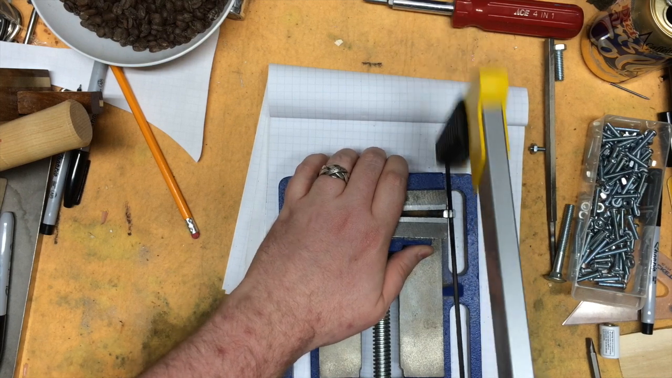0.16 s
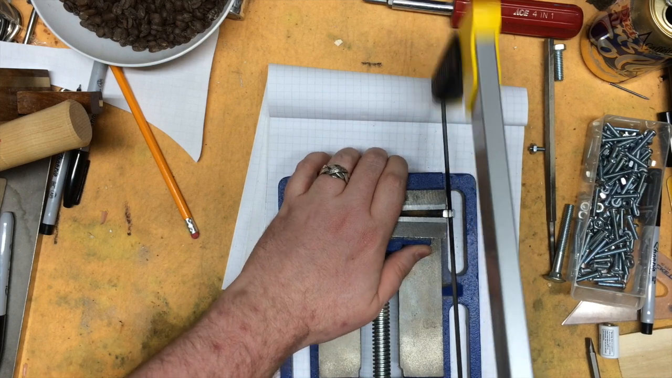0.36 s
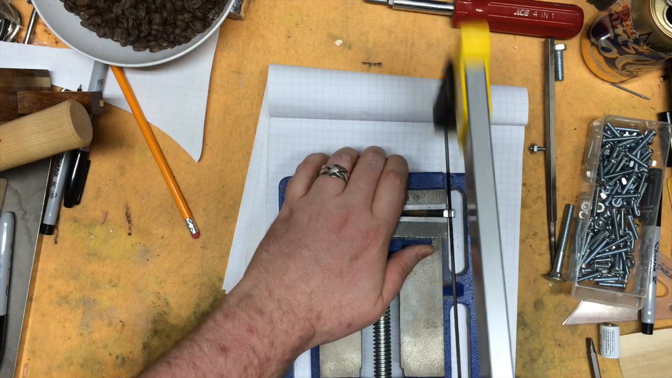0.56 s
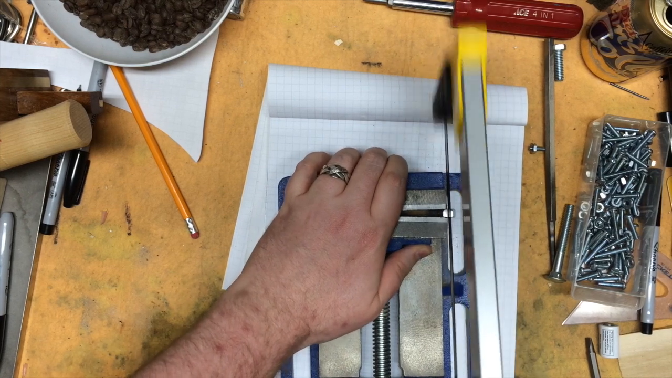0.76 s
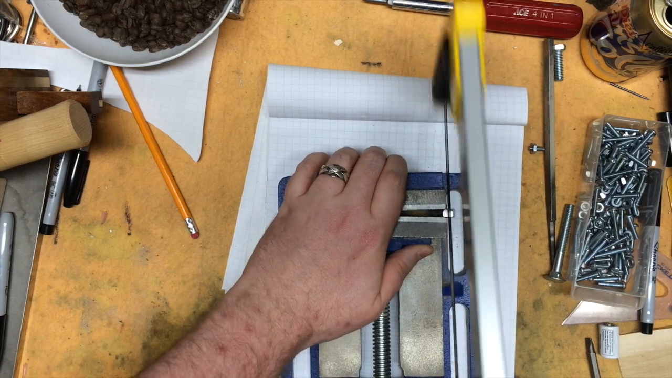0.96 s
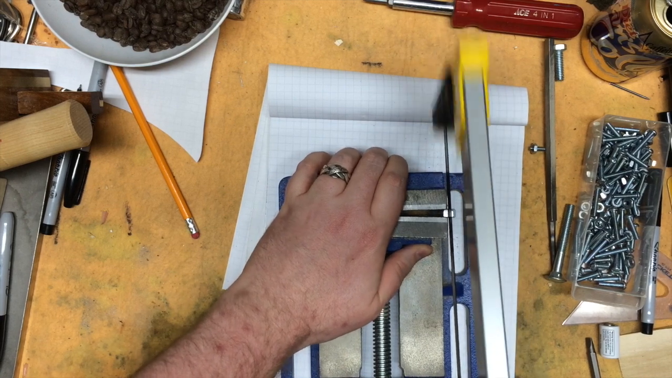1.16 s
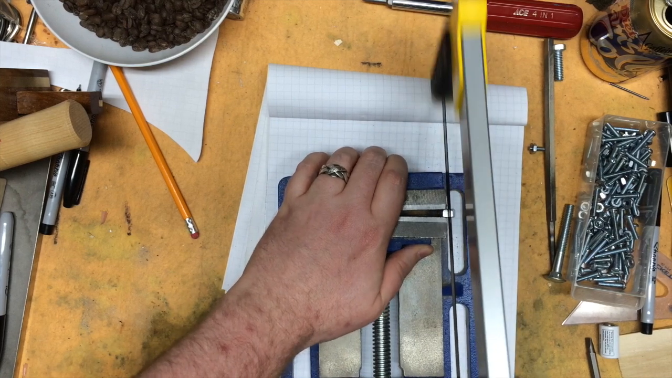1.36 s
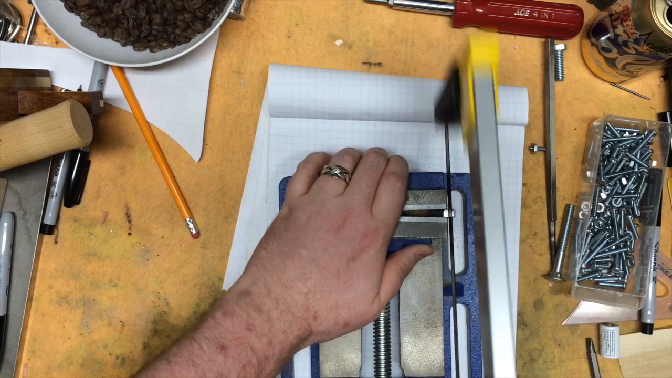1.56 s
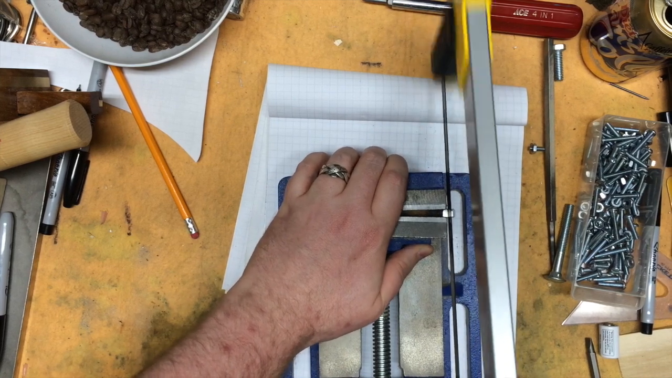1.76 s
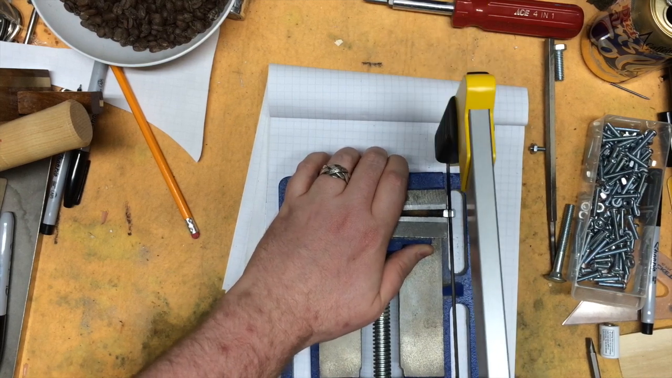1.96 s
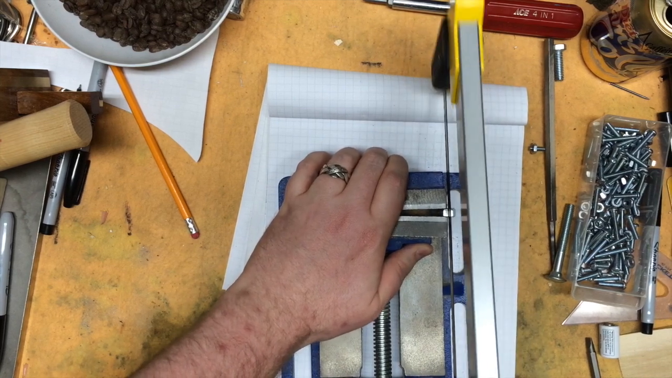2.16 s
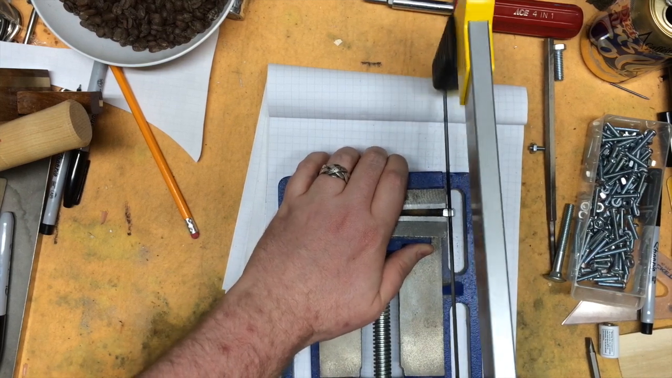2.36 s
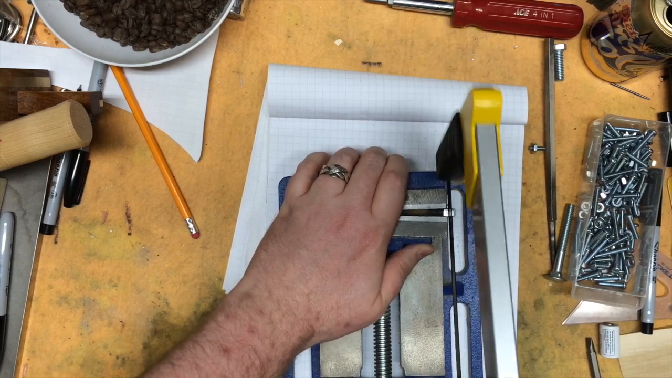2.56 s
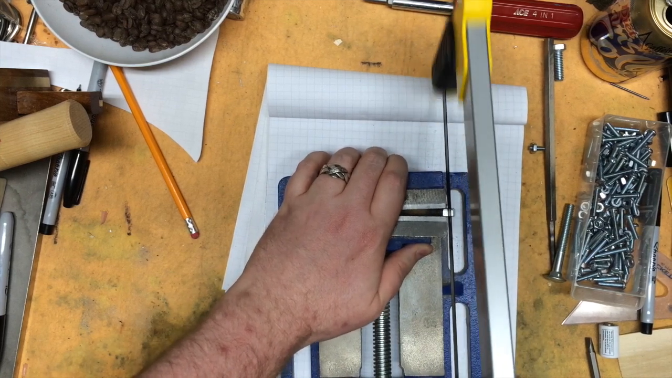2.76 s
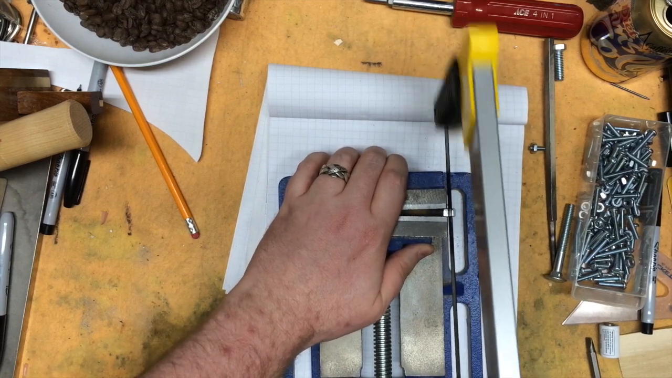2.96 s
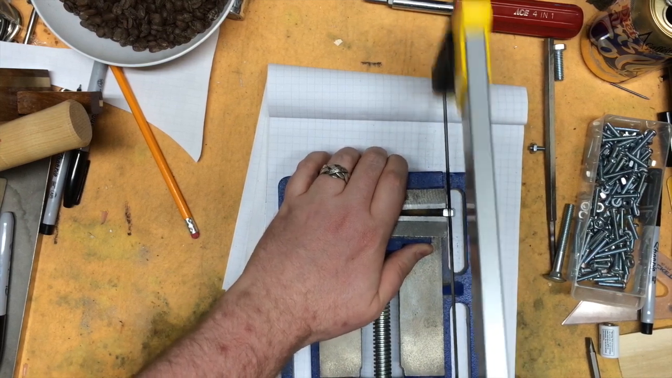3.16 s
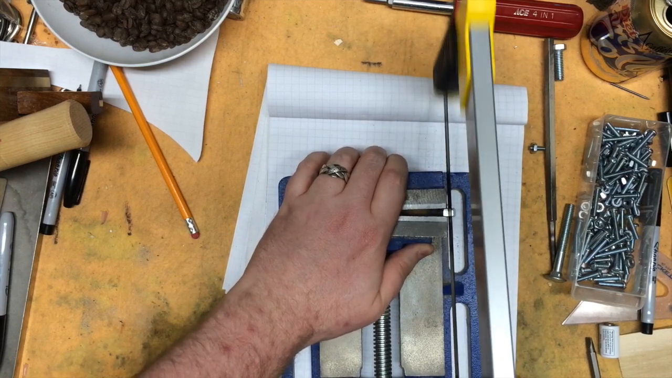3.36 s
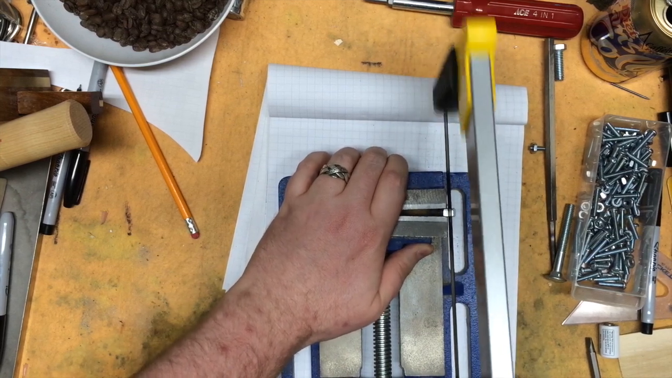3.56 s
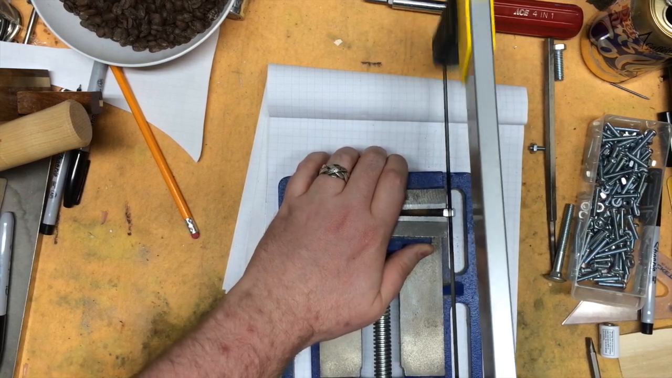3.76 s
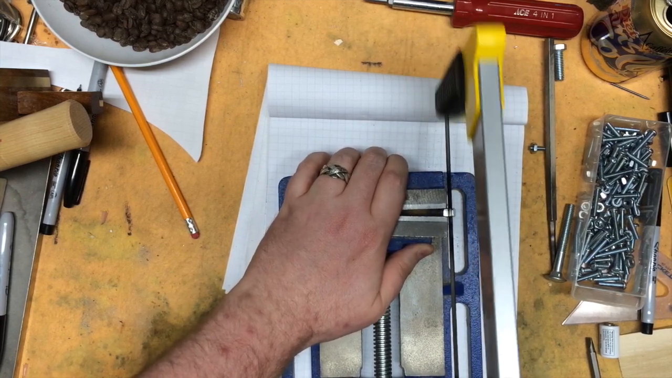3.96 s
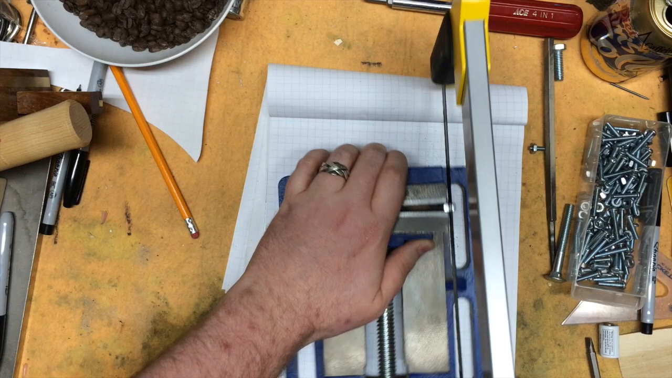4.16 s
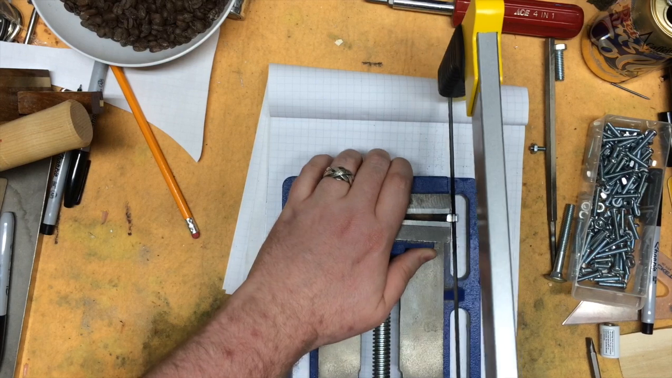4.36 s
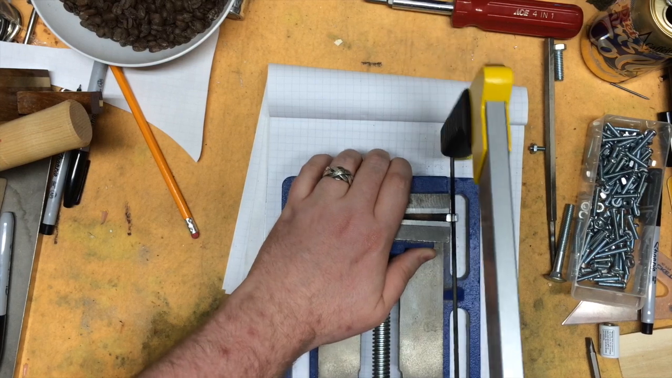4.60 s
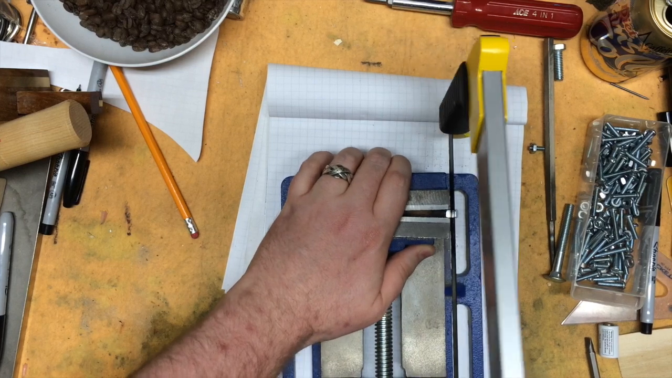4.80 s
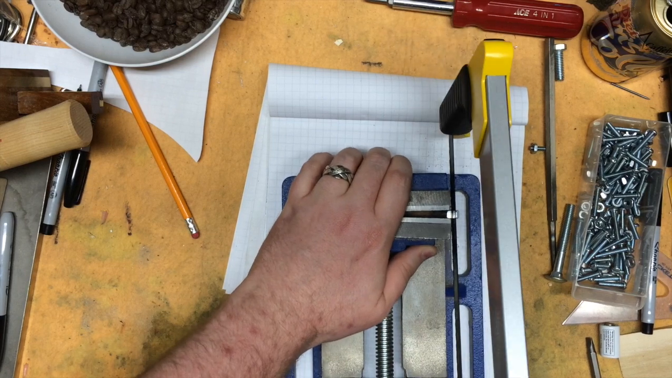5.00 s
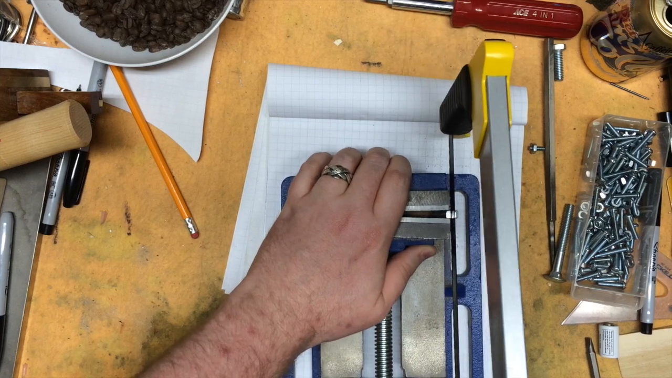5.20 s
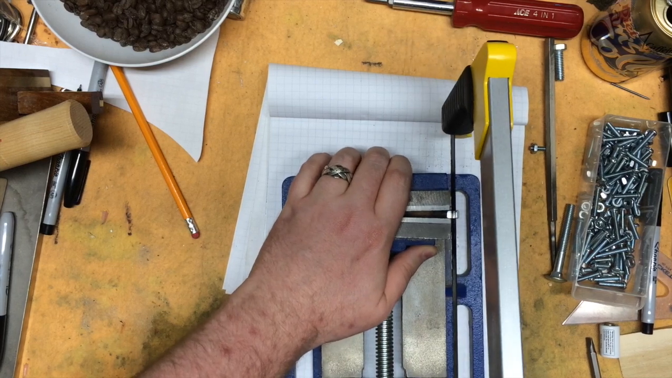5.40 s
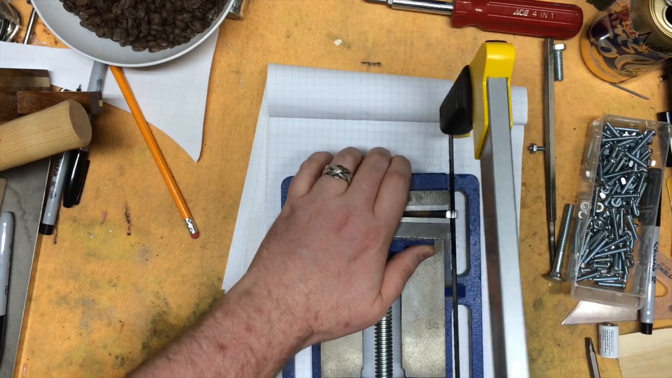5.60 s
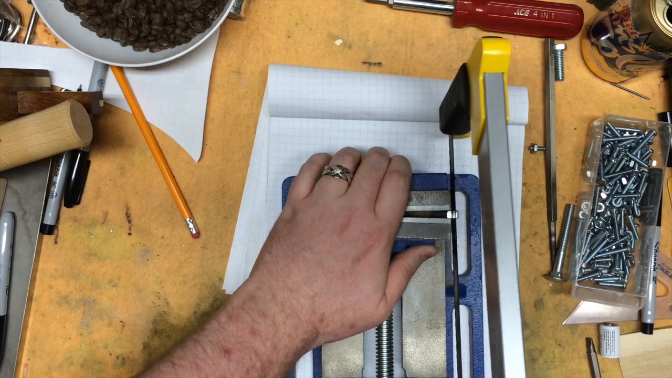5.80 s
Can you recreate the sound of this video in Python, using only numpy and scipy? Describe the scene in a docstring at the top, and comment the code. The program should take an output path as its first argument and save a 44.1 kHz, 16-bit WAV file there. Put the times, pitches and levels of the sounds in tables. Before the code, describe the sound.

A hacksaw cuts a steel nut clamped in a vise, close up in a small, quiet workshop. Quick, even strokes rasp back and forth, the blade ringing higher and lower as it changes direction. The teeth catch with sharp clicks and the wooden bench thumps underneath. After about four seconds the sawing slows, knocks to a stop and rattles briefly, leaving faint room noise.

```python
"""A hacksaw cuts a steel nut held in a small vise on a wooden bench, in quick, even strokes.
Its teeth tear off chips and shake the blade, frame and vise. The free part of the blade sings
higher as the saw goes out and lower as it comes back. The bench thumps where a push bites and
groans as the blade slows. At the end the saw slows, knocks to a stop and rattles out,
leaving the quiet air of a small workshop."""
import sys
import numpy as np
from scipy import signal
from scipy.io import wavfile
from scipy.ndimage import uniform_filter1d

SR = 44100
rng = np.random.default_rng(int(sys.argv[2]) if len(sys.argv) > 2 else 0)


def dump(signal):
    """Clip the signal to [-1, 1] and save it as 16-bit WAV at the path in sys.argv[1]."""
    limited = np.clip(np.atleast_2d(signal).T, -1, 1)
    pcm = np.round(limited * 32767).astype(np.int16)
    wavfile.write(sys.argv[1], SR, pcm)


N = 257499
TIME = np.arange(N) / SR


def amp(db):
    """Turns decibels into a number to multiply by."""
    return 10 ** (np.asarray(db) / 20)


def unit(x):
    """Scales a signal to an average strength (rms) of 1."""
    return x / np.sqrt(np.mean(x ** 2) + 1e-20)


def look_up(points, hz):
    """Reads between the rows of a table, on a log scale of pitch."""
    pitches, values = np.transpose(points)
    return np.interp(np.log(hz + 1), np.log(pitches + 1), values)


def add(mix, start_s, sound):
    """Mixes a sound in at the given time."""
    part = mix[max(round(start_s * SR), 0):][:len(sound)]
    part += sound[:len(part)]


def band(x, low_hz, high_hz):
    """Keeps the part of a sound between two pitches."""
    return signal.sosfilt(signal.butter(3, [low_hz, high_hz], "band", fs=SR, output="sos"), x)


def colour(x, points, size=8192):
    """Makes each pitch louder or softer, following a table of pitch_hz, level_db."""
    log_gain = np.log(amp(look_up(points, abs(np.fft.fftfreq(size, 1 / SR)))))
    response = np.exp(np.conj(signal.hilbert(log_gain)))  # nothing rings before its cause
    taps = np.fft.ifft(response).real[:size // 2]
    return signal.oaconvolve(x, taps)[:len(x)]


def resonate(x, hz, width_hz):
    """Makes a sound ring at one sliding pitch; a smaller width rings longer."""
    turn = np.exp(2j * np.pi * np.cumsum(hz) / SR)
    keep = np.exp(-np.pi * width_hz / SR)
    return 2 * (turn * signal.lfilter([1 - keep], [1, -keep], x / turn)).real


def body(x, tones):
    """Makes a sound ring at an object's own tones: rows of pitch_hz, width_hz, level_db."""
    t = np.arange(SR // 5) / SR
    ring = sum(amp(db) * 2 * np.pi * width / SR * np.exp(-np.pi * width * t) * np.cos(2 * np.pi * hz * t)
               for hz, width, db in tones)
    return signal.oaconvolve(x, ring)[:len(x)]


def wander(per_s):
    """A smooth random wobble that changes about per_s times a second."""
    size = int(SR / per_s)
    return unit(uniform_filter1d(uniform_filter1d(rng.standard_normal(N), size), size))


# The saw's strokes. A rise is the lean in level from start to end; fizz counts from the rasp's level.
# start_s, end_s, rasp_db, rasp_rise_db, fizz_db, bite_db, bite_rise_db, shake_db, from_hz, to_hz
STROKES = [ (-0.102, 0.063, -46.5, 6, -8.5, -47.5, -3, -44, 750, 1150),
           (0.087, 0.308, -34.5, -5, -9, -45.5, -5, -43.5, 1206, 686),
           (0.325, 0.511, -38, 5.5, -6, -41.5, 6, -40, 967, 1130),
           (0.572, 0.786, -38.5, -26, -7.5, -45, -9.5, -44.5, 1040, 650),
           (0.771, 0.952, -36, 8.5, -6.5, -41.5, 7.5, -40.5, 756, 1180),
           (0.986, 1.176, -33, -6, -9, -43.5, 1.5, -41, 1090, 680),
           (1.192, 1.357, -34.5, 3.5, -7.5, -36, -7, -40.5, 675, 924),
           (1.393, 1.592, -36, -17, -8.5, -44.5, 16.5, -46, 1090, 740),
           (1.585, 1.78, -35.5, 5.5, -7, -38, 20.5, -40.5, 745, 1140),
           (1.809, 2.055, -36.5, -21, -10, -43, -9, -43.5, 1104, 660),
           (2.056, 2.284, -42, 7.5, -7, -41, -5, -42.5, 700, 1116),
           (2.434, 2.719, -39, -5, -9.5, -40, 7, -47, 820, 685),
           (2.68, 2.907, -37.5, 7.5, -8.5, -35.5, 6, -41.5, 744, 1137),
           (2.949, 3.14, -38, -10.5, -10.5, -45, 3.5, -49.5, 1064, 720),
           (3.154, 3.36, -36.5, 1.5, -8, -39, -9.5, -46, 883, 1160),
           (3.373, 3.569, -40, -8, -11, -49, -24.5, -48.5, 1146, 1040),
           (3.596, 3.791, -39, 6, -8, -36.5, 9.5, -45.5, 990, 1130),
           (3.833, 4.018, -40, -21.5, -12, -46.5, -19, -48.5, 1123, 820),
           (4.033, 4.178, -35.5, 9, -9, -40, -14, -41.5, 1025, 1160),
           (4.235, 4.344, -43, 1, -3, -47, 0, -48.5, 803, 724),
           (4.493, 4.835, -50, -47, -10, -53.5, -36, -44.5, 900, 1140),
           (4.797, 4.84, -32.5, 1, -10.5, -37, -16.5, -34.5, 1100, 1110)]


def hand_motion(dwell=1.3):
    """The hand speeds up and slows in each stroke: gives its speed (0-1) and the blade's pitch."""
    speed, blade_hz = np.zeros(N), np.full(N, float(STROKES[0][-2]))
    for start, end, *_, from_hz, to_hz in STROKES:
        angle = np.pi * np.clip((TIME - start) / (end - start), 0, 1)
        travel = (1 - np.tanh(dwell * np.cos(angle)) / np.tanh(dwell)) / 2  # clings to both ends
        speed = np.maximum(speed, np.sin(angle))
        blade_hz = np.where(TIME >= start, from_hz + (to_hz - from_hz) * travel, blade_hz)
    return speed, blade_hz


def stroke_level(levels_db, rises_db, speed_power, linger_db, linger_s):
    """Level in dB: a stroke swells with speed, leans early or late with pressure, then lingers."""
    power = np.zeros(N)
    for (start, end, *_), db, rise_db in zip(STROKES, levels_db, rises_db):
        during = (TIME > start) & (TIME < end)
        progress = (TIME[during] - start) / (end - start)
        pressure = amp(db + rise_db * (progress - .5))
        power[during] += (pressure * np.sin(np.pi * progress) ** speed_power) ** 2
    power = abs(uniform_filter1d(power, size=400))  # the hand never turns in an instant
    keep = np.exp(-np.log(1e6) / (linger_s * SR))  # falls 60 dB in linger_s
    lingering = amp(linger_db) ** 2 * signal.lfilter([1 - keep], [1, -keep], power)
    return 10 * np.log10(power + lingering + 1e-14)


def teeth(speed, jitter=.06, grip=0.99, slide=0.38, chips_per_s=3500, chip_db=2.5, uneven_db=0.9):
    """The cutting force: each passing tooth gives a burst of rubbing, and chips snap off at random."""
    teeth_per_s = (165.6 + 540 * speed) * (1 + jitter * wander(90))
    passed = np.cumsum(teeth_per_s) / SR
    contact = slide + np.exp(-(passed % 1) / grip)
    snaps = (rng.random(N) < chips_per_s / SR) * rng.choice([-1, 1], N)
    chips = snaps * amp(chip_db * np.minimum(rng.exponential(1, N), 2.5))
    rubbing = rng.standard_normal(N)
    return unit(contact * (rubbing + 0.5 * unit(chips))) * amp(uneven_db * wander(140))


def moving_contact(x, patchy_db=3.5):
    """The cut moves along the blade, so the blade's many close tones take turns to ring."""
    spectrum = signal.stft(x, nperseg=512, noverlap=384)[2]
    patches = uniform_filter1d(rng.standard_normal(spectrum.shape), size=14, axis=1)  # smooth in time
    patches = unit(uniform_filter1d(patches, size=2, axis=0))  # and in pitch
    spectrum = spectrum * amp(patchy_db * np.clip(patches, -2, 2))
    return unit(signal.istft(spectrum, nperseg=512, noverlap=384)[1][:N])


# The overall colour of scraping steel: pitch_hz, level_db
SCRAPE_COLOUR = [(150, -19), (300, -14.5), (550, -26.5), (1000, -9.5), (1500, -15), (1900, -9.5),
                 (2600, -3.5), (4000, -6), (5600, -13), (7800, -14), (9000, -23), (10500, -30.5),
                 (12000, -40), (13300, -29), (15300, -31)]
# Tones of the blade, frame and vise under the teeth: pitch_hz, width_hz, level_db
STEEL_TONES = [(1460, 90, -13.5), (1773, 170, -10.5), (2186, 60, -3.5), (2459, 75, -1), (2590, 25, -2),
               (2683, 47, 7), (2910, 37, -4), (3100, 40, -15), (3174, 26, -2.5), (3510, 100, -12.5),
               (4020, 36, -8), (4087, 88, -9.5), (4140, 76, -15.5), (4830, 230, -13.5), (5630, 75, -17),
               (6830, 43, -12), (7210, 55, -8), (7480, 24, -3), (8300, 39, -29), (12200, 100, -15.5),
               (14700, 230, -31.5)]


def rasp(force, level_db, fizz_db, blade_hz, end_echo=0.61, steel_db=3, split_hz=6300):
    """The teeth scrape steel: a broad hiss and ringing metal, with a fizz of fine chips on top."""
    returning = np.interp(TIME - 1 / blade_hz, TIME, force)  # waves come back from the blade's end
    along = moving_contact(force + end_echo * returning)
    sideways = moving_contact(force * rng.choice([-1, 1], N))  # angled teeth kick left and right
    sound = colour(along, SCRAPE_COLOUR) + amp(steel_db) * body(sideways, STEEL_TONES)
    scrape = signal.sosfiltfilt(signal.butter(4, split_hz, fs=SR, output="sos"), sound)
    fizz = sound - scrape
    return amp(level_db) * (amp(0.4) * unit(scrape) + amp(fizz_db - 0.06) * unit(fizz))


# Tones of the vise and the nut: pitch_hz, width_hz, level_db
VISE_TONES = [(737, 16, -13), (760.5, 17, -5), (926, 17, -4.5), (1090, 50, -19.5), (1113, 16, 10),
              (1100, 19, -16.5)]


def bite(force, level_db, blade_hz, waver=0.06, flicker_db=2, blade_db=-8, shared_db=-4, vise_db=-6):
    """The free part of the blade sings in fits, and swells where its pitch meets a tone of the vise."""
    hz = blade_hz * (1 + waver * wander(50))
    blade = resonate(resonate(force, hz, width_hz=80), hz, width_hz=450)
    blade = unit(blade * amp(flicker_db * wander(35)))
    shared = body(blade, VISE_TONES)
    power = uniform_filter1d(shared ** 2, size=1600) + 0.042 * np.mean(shared ** 2)
    shared = shared / np.sqrt(power)  # rubbing limits the swing
    vise = unit(body(force, VISE_TONES))
    swell = uniform_filter1d(amp(level_db), size=1200)  # the swing takes time to build and to fade
    return swell * (amp(blade_db) * blade + amp(shared_db) * shared + amp(vise_db) * vise)


# The hand eases off and the blade goes loose: time_s, looseness (0 tight, 1 loose)
LOOSENESS = [(4.1, 0.02), (4.125, 1), (4.5, 0.18), (4.8, 0.99)]


def blade_in_slot(force, level_db, blade_hz):
    """A tight blade bites and sings; a loose one only scuffs the slot, dull and broad."""
    loose = np.interp(TIME, *np.transpose(LOOSENESS))
    singing = bite(force, level_db, blade_hz)
    scuff = amp(level_db) * unit(band(force, low_hz=450, high_hz=1100))
    return np.sqrt(1 - loose) * singing + np.sqrt(loose) * scuff


# The colour of the shaking bench: pitch_hz, level_db
BENCH_COLOUR = [(20, -23.5), (45, -12), (65, -5), (80, -6), (105, -5), (124, 5), (145, -7.5), (180, -4),
                (220, -8.5), (255, -21.5), (330, -23), (500, -34), (1000, -55)]


def bench_rumble(level_db, trim_db=-1):
    """The bench rumbles under the strokes, and the hand's weight evens it out."""
    rumble = colour(rng.standard_normal(N), BENCH_COLOUR)
    power = uniform_filter1d(rumble ** 2, size=2200) + 0.13 * np.mean(rumble ** 2)
    return amp(level_db + trim_db) * rumble / np.sqrt(power)


# The colour of the workshop's still air: pitch_hz, level_db
AIR_COLOUR = [(15, -46), (25, -19.5), (59, 1), (96, -8.5), (129, 7), (156, -12), (349, -13.5), (582, -22.5),
              (722, -23), (1170, -29), (1620, -29.5), (3340, -33), (8130, -38.5), (10900, -38),
              (15500, -43)]


def air(air_db=-63.5, hiss_hz=11000, hiss_width_hz=300, hiss_db=-86):
    """Low, steady room noise with a faint high hiss."""
    still = unit(colour(rng.standard_normal(N), AIR_COLOUR))
    hiss = unit(body(rng.standard_normal(N), [(hiss_hz, hiss_width_hz, 0)]))
    return amp(air_db) * still + amp(hiss_db) * hiss


# Tones of the saw's frame: pitch_hz, level_db, ring_s (time to fall 60 dB)
FRAME_TONES = [(1447, -8, 0.18), (1716, -6, 0.23), (2400, -8.5, 0.11), (2620, 3, 0.16), (2640, 6, 0.073),
               (2830, -14.5, .2), (2866, -5.5, .1), (3200, -2, 0.15), (3500, -6, 0.14), (3320, -4.5, 0.16),
               (3950, 1.5, .14), (4190, -24.5, .15), (4530, -14, .11), (4904, -11.5, 0.073),
               (6368, -20, .15), (7270, -20.5, .12)]


def frame_ring(t):
    """The frame rings freely after a knock, starting at a strength of 1."""
    ring = sum(amp(db - 60 * t / ring_s) * np.sin(2 * np.pi * (hz * t + rng.random()))
               for hz, db, ring_s in FRAME_TONES)
    return ring / ring[:SR // 250].std()


# Teeth catch and the saw knocks in the slot: time_s, snap_db (crack and ring), thud_db
CATCHES = [(0.1065, -40, -40), (0.125, -30, -31), (0.191, -23, -52), (0.5832, -19.5, -32.5),
           (0.876, -17.5, -30), (1.027, -17, -36), (1.4058, -37, -37.5), (1.686, -20, -27.5),
           (1.8404, -24.5, -28), (1.893, -17.5, -41), (2.9634, -50, -53), (3.218, -26, -28),
           (3.42, -44, -41), (3.4731, -24, -33), (3.703, -45, -31), (3.865, -32, -29.5),
           (4.073, -40.5, -20), (4.098, -27, -18.5), (4.132, -25, -47.5), (4.1733, -25.5, -62),
           (4.5107, -35, -40.5), (4.8056, -24, -24.5), (4.8222, -19.5, -48.5), (4.839, -21.5, -43)]


def tooth_catches(crack_db=-13, ring_db=-18, vise_db=-4, rise_s=.002, crack_s=0.0035, drag_s=0.00397):
    """A tooth snags and lets go: its drag swings the vise, then comes a crack and the frame rings."""
    out, t = np.zeros(N), np.arange(SR // 2) / SR
    hand_damping = np.exp(-t / 0.06)
    for time_s, snap_db, thud_db in CATCHES:
        noise = rng.standard_normal(len(t))
        crack = colour(noise * (1 - np.exp(-t / rise_s)) * np.exp(-t / crack_s), SCRAPE_COLOUR)
        crack = crack / crack[:SR // 250].std()
        add(out, time_s, amp(snap_db) * (amp(crack_db) * crack + amp(ring_db) * frame_ring(t)))
        drag = noise * t * np.exp(-t / drag_s)
        thud = band(body(drag, VISE_TONES), low_hz=700, high_hz=1400) * hand_damping
        add(out, time_s - drag_s, amp(thud_db + vise_db) * thud / abs(thud).max())
    return out


# The vise thumps the bench: start_s, peak_db, settled_pitch_hz, ring_s (time to fall 60 dB)
THUMPS = [(0.145, -31.5, 121.2, 0.32), (0.372, -27.5, 116, 0.13), (0.388, -35, 70, 0.2),
          (0.587, -30.5, 120, 0.054), (0.777, -27, 144.3, 0.3), (0.926, -37, 129, 0.1),
          (1.193, -19.5, 137.3, 0.15), (1.215, -21.5, 126.5, 0.18), (1.595, -19.5, 132, 0.22),
          (2.073, -18.5, 114.5, 0.27), (2.705, -16, 123.3, 0.18), (2.748, -21.5, 137, 0.061),
          (2.862, -38.5, 118.4, 0.24), (3.163, -24.5, 121.4, 0.2), (3.602, -33.5, 120.6, 0.39),
          (4.033, -28, 123.4, 0.14), (4.108, -29, 132, 0.043), (4.455, -44, 131, 0.23),
          (4.69, -36, 120.5, 0.18), (4.722, -25.5, 115, 0.16), (4.785, -33, 85, 0.25),
          (4.808, -20.5, 174, 0.044), (4.815, -34.5, 49, 0.21)]


def vise_thumps(rise_s=0.0049, sag=0.13, sag_s=0.017, upper_ratio=1.7, upper_db=-11, upper_s=0.013):
    """The rocking vise thumps the bench, and the pitch sags as it settles."""
    out, t = np.zeros(N), np.arange(SR // 2) / SR
    for start_s, peak_db, hz, ring_s in THUMPS:
        phase = 2 * np.pi * np.cumsum(hz * (1 + sag * np.exp(-t / sag_s))) / SR
        upper_tone = amp(upper_db) * np.exp(-t / upper_s) * np.sin(upper_ratio * phase)
        shape = (1 - np.exp(-(t / rise_s) ** 2)) * amp(-60 * t / ring_s)
        thump = (np.sin(phase) + upper_tone) * shape
        add(out, start_s, amp(peak_db) * thump / abs(thump).max())
    return out


# Near a turn, slow teeth groan through the bench: start_s, length_s, peak_db, from_hz, to_hz
GROANS = [(0.265, 0.057, -35, 245, 158), (0.709, 0.057, -34, 241, 160), (1.126, 0.081, -32, 208, 159),
          (1.316, 0.058, -34.5, 265, 119), (1.53, 0.066, -29.5, 210, 144), (1.731, 0.046, -35.5, 339, 141),
          (1.975, 0.055, -30.5, 197, 139), (2.079, 0.075, -41.5, 255, 340), (2.211, 0.068, -37, 243.4, 130),
          (2.63, 0.08, -31.5, 184, 137), (2.705, 0.07, -35.5, 211, 299), (2.845, 0.062, -38, 239, 140),
          (3.09, 0.094, -41, 206, 151), (3.735, 0.064, -35.5, 265, 118.8), (4.259, 0.063, -49, 364, 270)]


def bench_groans(waver=0.046):
    """Single teeth bump over the nut's edge: a short, low tone that glides as their pace changes."""
    out, unsteady = np.zeros(N), 1 + waver * wander(120)
    for start_s, length_s, peak_db, from_hz, to_hz in GROANS:
        progress = np.arange(0, length_s, 1 / SR) / length_s
        hz = (from_hz + (to_hz - from_hz) * progress) * unsteady[round(start_s * SR):][:len(progress)]
        tone = np.sin(2 * np.pi * np.cumsum(hz) / SR)
        add(out, start_s, amp(peak_db) * np.sin(np.pi * progress) ** 2 * tone)
    return out


# The slack frame chatters in runs of quick clinks: start_s, end_s, level_db, fade_db_per_s
RATTLES = [(4.177, 4.235, -33, 260), (4.696, 4.79, -39.5, 49.5), (4.863, 5.03, -35.5, 142)]


def frame_rattles(gap_s=0.023, trim_db=-3, rise_s=.002, damp_s=0.015, scrape_db=-5, scrape_s=.009):
    """The frame bounces on the slack blade: each clink scrapes and rings until contact damps it."""
    out, t = np.zeros(N), np.arange(SR // 5) / SR
    for start_s, end_s, level_db, fade_db_per_s in RATTLES:
        for time_s in np.arange(start_s, end_s, gap_s):
            ring = band(frame_ring(t) * np.exp(-t / damp_s), low_hz=2300, high_hz=3700)
            scrape = unit(colour(rng.standard_normal(len(t)), SCRAPE_COLOUR)) * np.exp(-t / scrape_s)
            clink = (1 - np.exp(-t / rise_s)) * (ring + amp(scrape_db) * scrape)
            add(out, time_s, amp(level_db + trim_db - fade_db_per_s * (time_s - start_s)) * clink)
    return out


# The resting saw nudges the nut: time_s, level_db
NUDGES = [(5.258, -56), (5.651, -56.5)]


def saw_nudges(rub_s=0.0096, lead_s=.008, wood_hz=345, wood_width_hz=50, wood_db=-9):
    """The resting blade shifts softly in its slot, and the bench answers with a low knock."""
    out, t = np.zeros(N), np.arange(SR // 4) / SR
    for time_s, level_db in NUDGES:
        rub = rng.standard_normal(len(t)) * t * np.exp(-t / rub_s)
        slot = band(rub, low_hz=1050, high_hz=1260)
        wood = body(rub, [(wood_hz, wood_width_hz, 0)])
        nudge = slot / abs(slot).max() + amp(wood_db) * wood / abs(wood).max()
        add(out, time_s - lead_s, amp(level_db) * nudge)
    return out


# How long the workshop echoes: pitch_hz, ring_s (time to fall 60 dB)
ECHO_TIMES = [(120, 0.27), (1000, 0.41), (4000, 0.21), (14000, 0.23)]


def workshop_echo(x, echoes_per_s=2500):
    """Sound bounces around the room, and each pitch dies away at its own speed."""
    echoes = rng.choice([-1., 1.], SR // 2) * (rng.random(SR // 2) < echoes_per_s / SR)
    echoes[:SR // 250] = 0  # nothing comes back in the first 4 ms
    hz, t, spectrum = signal.stft(echoes, SR, nperseg=256)
    fade = amp(-60 * t / look_up(ECHO_TIMES, hz)[:, None])
    tail = signal.istft(spectrum * fade, SR, nperseg=256)[1]
    return signal.oaconvolve(x, tail / np.linalg.norm(tail))[:N]


def scene(room_db=-13.5, pressure_db=0.87):
    """One cutting force drives saw and vise, heard close up; the hand's pressure is never quite even."""
    speed, blade_hz = hand_motion()
    _, _, rasps, rasp_rises, fizzes, bites, bite_rises, shakes, _, _ = np.transpose(STROKES)
    rasp_db = stroke_level(rasps, rasp_rises, speed_power=1.284, linger_db=-15.5, linger_s=0.51)
    fizz_db = stroke_level(rasps + fizzes, rasp_rises, speed_power=1.44, linger_db=-15, linger_s=0.2)
    bite_db = stroke_level(bites, bite_rises, speed_power=1.42, linger_db=-19, linger_s=0.15)
    shake_db = stroke_level(shakes, np.zeros(len(shakes)), speed_power=0.13, linger_db=-5.5, linger_s=.55)
    uneven_db = pressure_db * wander(per_s=45)
    force = teeth(speed)
    direct = blade_in_slot(force, bite_db + uneven_db, blade_hz)
    direct += rasp(force, rasp_db + uneven_db, fizz_db - rasp_db, blade_hz)
    direct += tooth_catches() + frame_rattles() + saw_nudges()
    direct += bench_rumble(shake_db) + vise_thumps() + bench_groans()
    return (direct + amp(room_db) * workshop_echo(direct) + air())[None]


def record(dry):
    """Cuts away the very highest treble."""
    taps = signal.firwin(401, cutoff=15350, window=("kaiser", 9), fs=SR)
    return signal.oaconvolve(dry, taps[None], "same")


dry = scene()
out = record(dry)
dump(out)
```